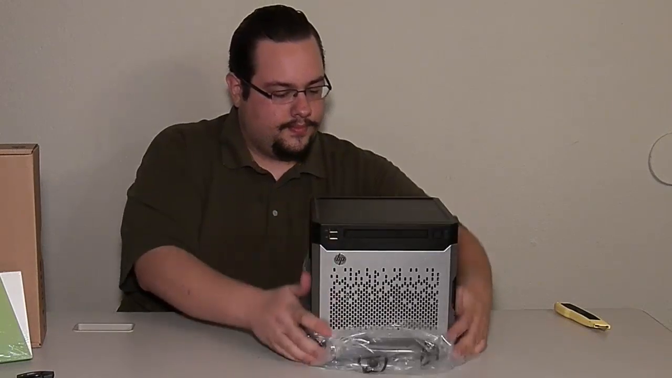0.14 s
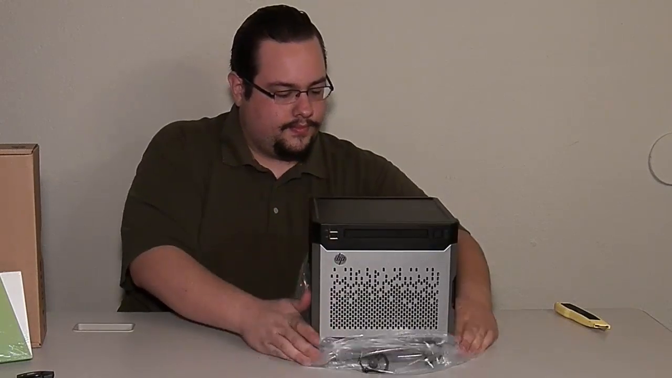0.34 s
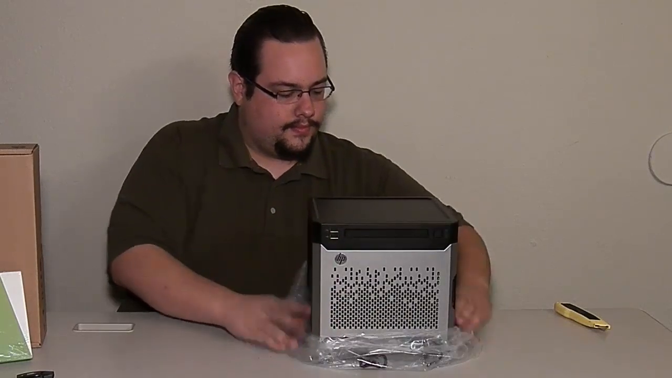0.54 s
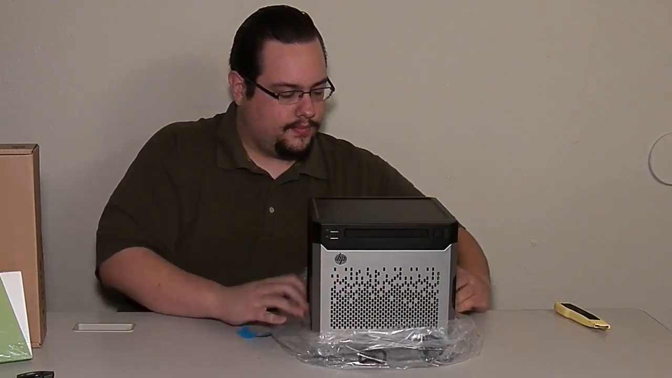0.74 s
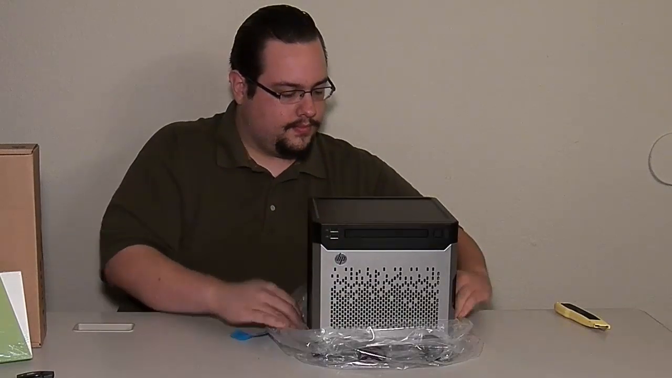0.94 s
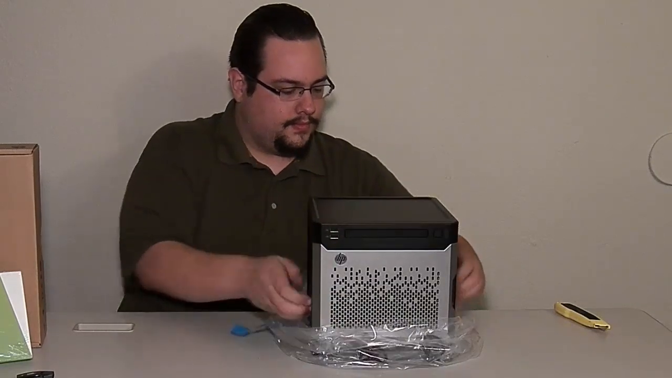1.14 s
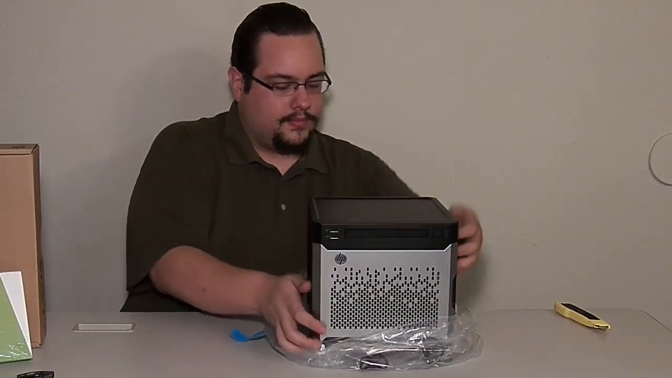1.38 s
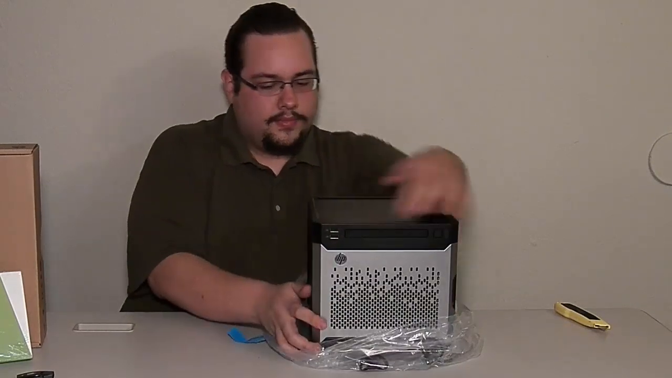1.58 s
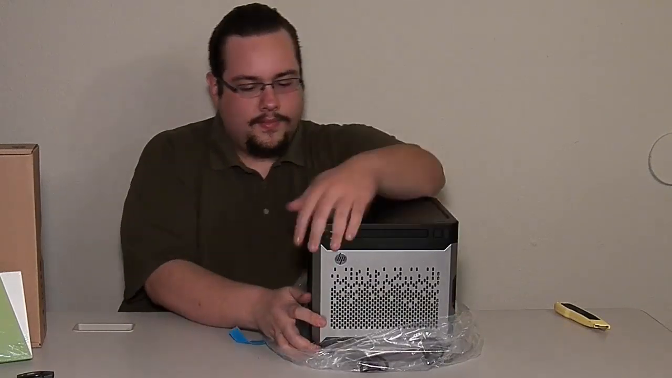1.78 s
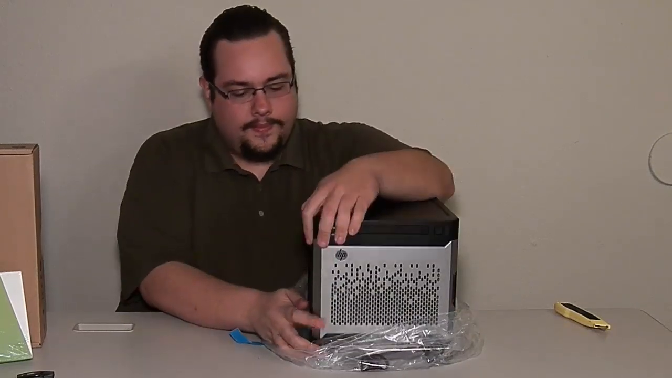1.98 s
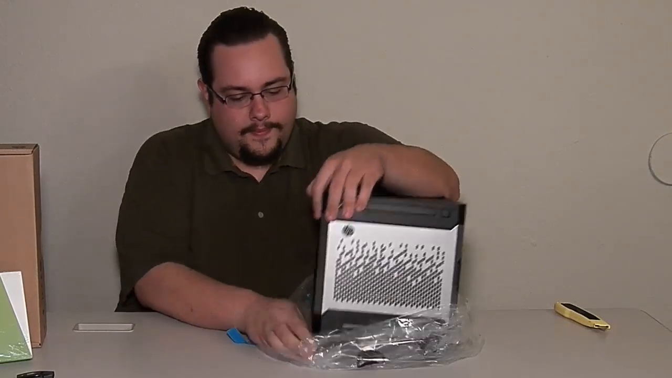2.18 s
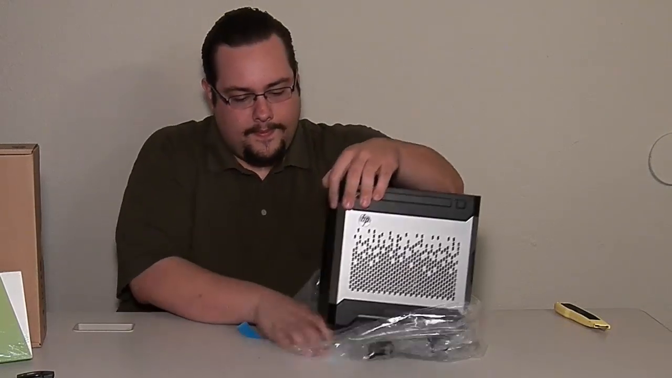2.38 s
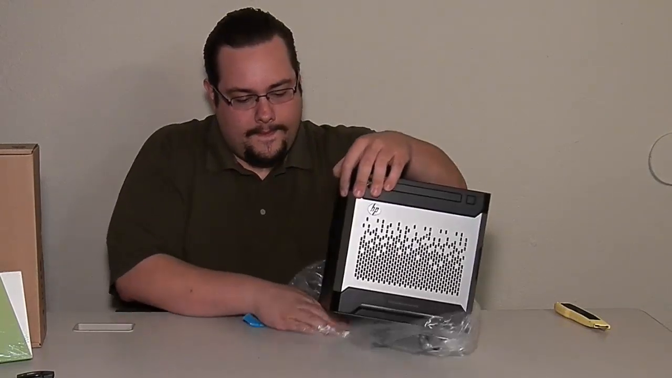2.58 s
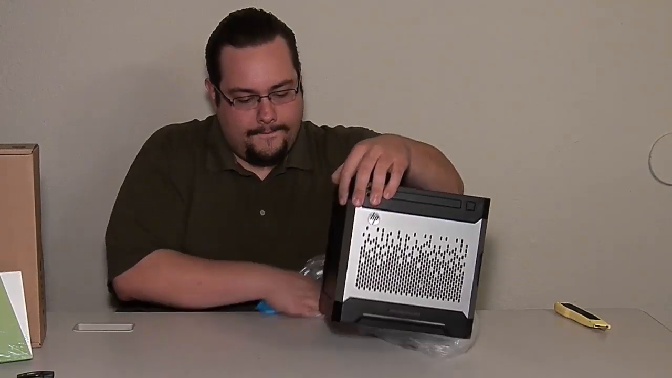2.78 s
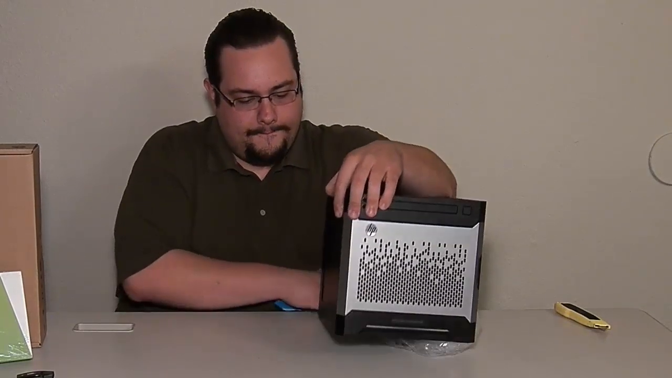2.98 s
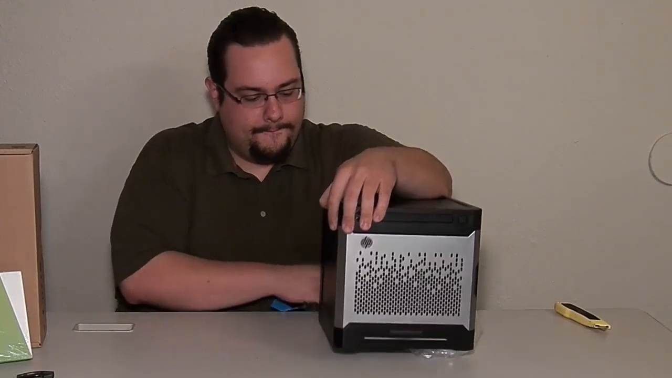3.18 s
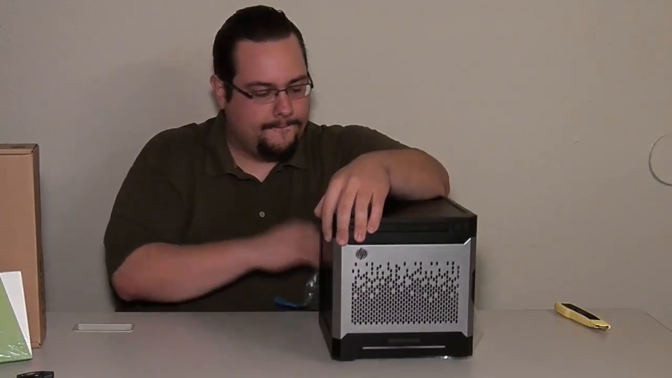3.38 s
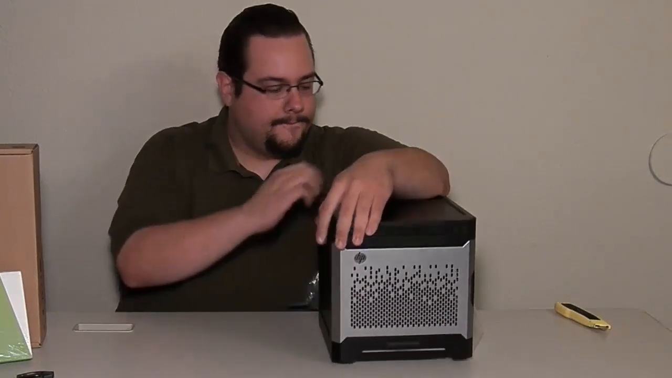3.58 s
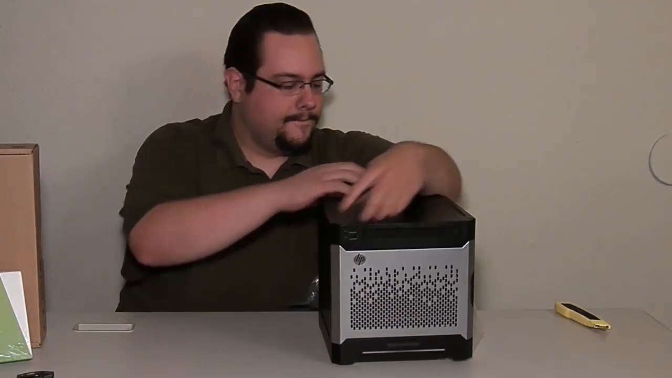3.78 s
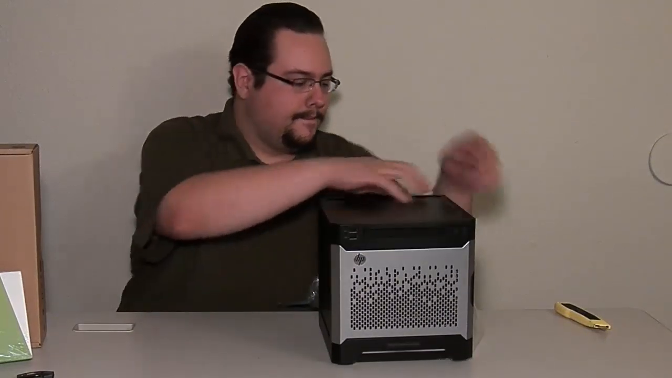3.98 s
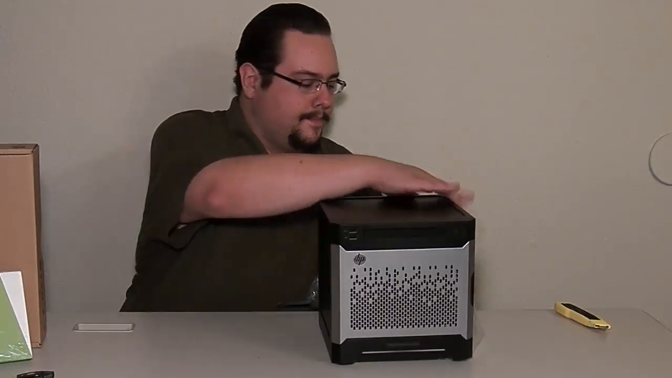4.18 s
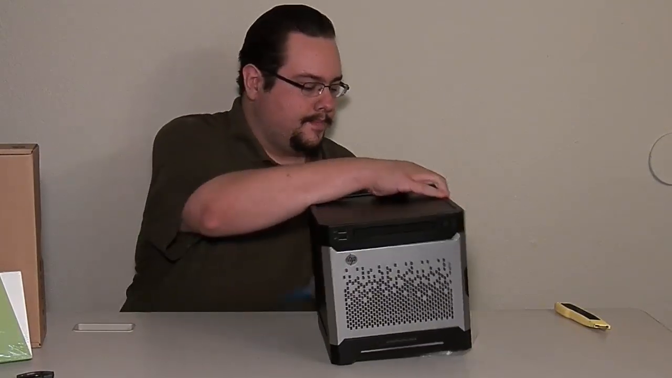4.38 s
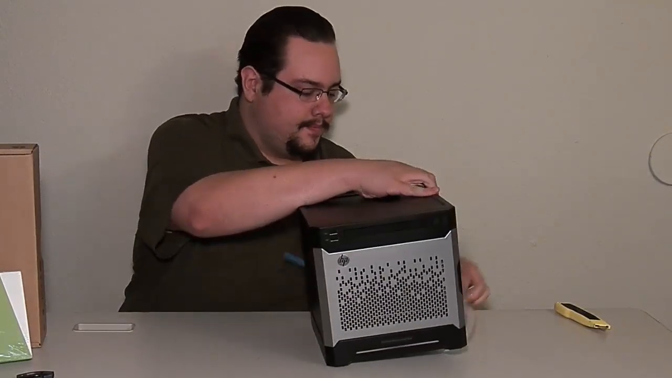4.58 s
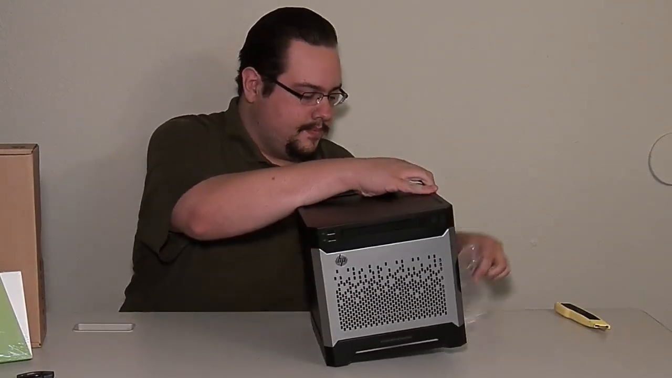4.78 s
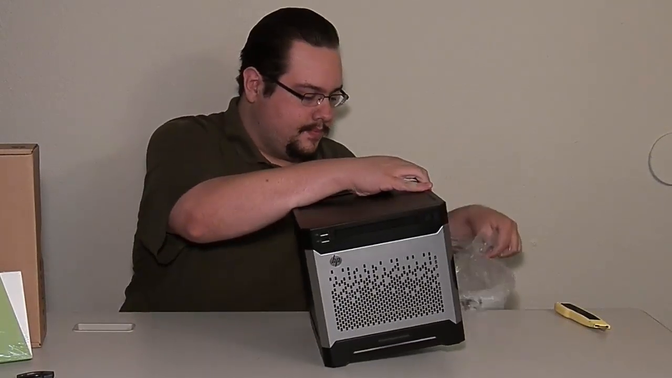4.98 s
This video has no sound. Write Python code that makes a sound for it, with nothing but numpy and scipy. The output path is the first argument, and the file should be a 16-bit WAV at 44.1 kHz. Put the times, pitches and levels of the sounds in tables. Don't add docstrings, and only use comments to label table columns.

```python
import sys
import numpy as np
from scipy import signal
from scipy.fft import rfft, irfft, next_fast_len
from scipy.io import wavfile
from scipy.ndimage import uniform_filter1d, map_coordinates

SR = 44100
rng = np.random.default_rng(int(sys.argv[2]) if len(sys.argv) > 2 else 0)


def store_wav(level_fs):
    pcm = np.round(np.clip(np.atleast_2d(level_fs), -1, 1) * 32767)
    wavfile.write(sys.argv[1], SR, pcm.T.astype(np.int16))


def magnitude_from_level(level_db):
    exponent = np.asarray(level_db, float) / 20
    return 10 ** exponent


N = 222043

# t/s, effort level/dB, drag on the box against the effort level/dB
HAND_PULL = [(0, -43.5, -4.5), (.7, -45.5, -8.5), (0.904, -42, -5.5), (.965, -56.5, -9.5),
             (1.35, -52, -10.5), (1.5, -57, -23), (1.82, -66.5, -29), (2.13, -56.5, -12),
             (2.2, -49.5, -13.5), (2.42, -43.5, -5.5), (2.87, -43, -2), (3.05, -55, -5), (3.28, -58.5, -18),
             (3.77, -72.5, -3.5), (4.205, -89.5, 2), (4.249, -52.5, -8), (4.8, -45.5, -1.5),
             (5.03, -53.5, -6.5)]
# middle t/s, lift level/dB, half length t/s, coarseness level/dB
TUGS = [(0.015, 3, 0.05, -1.5), (0.156, -1.5, 0.0099, -1), (0.242, -2.5, .05, 0), (0.484, 1, 0.12, 0),
        (0.673, -4, 0.026, -0.5), (.83, 0.5, .03, -0.5), (1.095, 6, 0.051, 0), (1.188, -2, .02, 2),
        (1.357, 3.5, 0.025, -1.5), (1.456, 2, 0.04, 0.5), (1.656, 6, 0.02, 1.5), (1.733, 6.5, 0.018, 4.5),
        (1.852, 6.5, 0.017, -4), (1.99, 2, 0.018, 1), (2.3, 3.5, .02, 1.5), (2.415, 2.5, 0.032, -1.5),
        (2.513, -2, 0.034, 0.5), (2.57, 3.5, .01, 0), (2.652, 2, 0.033, 0), (2.728, -3.5, 0.022, 2),
        (3.16, 5.5, 0.057, 1.5), (3.385, 9.5, 0.048, 3), (3.498, 12, 0.0071, 4.5), (3.551, -15, 0.019, 0),
        (3.667, 7, 0.068, 0), (3.81, 3, .03, -5), (3.9, -2, 0.011, -10), (4.64, 1.5, 0.021, -2.5),
        (4.883, 0.5, 0.013, -5), (4.96, 1, 0.022, -3)]
# t/s, fine creases against the usual level/dB
CRISPNESS = [(0, 0), (.2, 0), (1.0, 0.5), (1.3, -0.5), (1.56, -1), (1.7, 3), (1.9, -1.5), (2.13, -7),
             (2.19, 0.5), (2.5, 0), (3.2, -0.5), (3.5, 0.5), (3.6, -0.5), (3.8, -2.5), (4.4, 1.5),
             (5.03, -0.5)]
# f/Hz, level/dB per Hz
FILM_COLOUR = [(290, -6.5), (500, -12), (639, -7), (1070, -7), (1150, -5.5), (1200, -6), (1580, -6.5),
               (2540, -7.5), (3970, 3), (4580, 0), (11200, -15), (14500, -20), (15600, -37)]
CREASE_EDGES = (800, 2500, 6000, 10000, 20000)
# burst life t/s, left-right unlikeness [ratio], share of dullness [ratio]
CREASE_SIZES = [(0.0023, 0.26, 0.43), (0.0017, 0.53, -0.17), (0.0027, 1.25, -0.19), (.003, 1.5, -0.71)]
# f/Hz, width f/Hz, level/dB
MIC_PORT = (3780, 400, 2.6)
# t/s, peak level/dB, low part level/dB, high part level/dB
SETTLING_SNAPS = [(.0413, -22, -7, -5), (.1566, -24, -1, 10), (.334, -27, -2, 10), (.4968, -26, -20, -23),
                  (.5236, -26, -13, -10), (.8126, -26, -8, -5), (1.0194, -33, -13, -2),
                  (1.4628, -32, -19, -6), (1.4917, -35, -15, -8), (1.5486, -41, 1, -7),
                  (1.5978, -36, -14, -1), (1.6321, -42, -1, -16), (1.6379, -39, -3, -2),
                  (1.6644, -38, -10, -2), (1.6741, -36, -4, -14), (1.716, -40, 2, -2), (1.7204, -40, 2, -6),
                  (1.732, -40, 0, -6), (1.7453, -36, -5, -9), (1.8329, -37, -14, -2), (1.8449, -46, 0, -6),
                  (1.8729, -44, -15, -22), (1.8976, -44, -1, -19), (1.9303, -38, -2, -2),
                  (1.9772, -38, -6, -22), (1.9933, -46, -16, -4), (2.007, -43, -1, 3),
                  (2.082, -38, -15, -6), (2.1208, -38, 0, -10), (2.1571, -39, -9, -13)]
# t/s, peak level/dB, low part level/dB, high part level/dB
DRAGGED_SNAPS = [(2.1835, -27, -8, -9), (2.2007, -33, -5, -5), (2.3045, -27, -7, -7), (2.3518, -26, -14, 3),
                 (2.4093, -25, -12, -14), (2.4249, -20, -22, -10), (2.4376, -21, -6, -11),
                 (2.5525, -27, -4, -9), (2.6225, -24, -5, -9), (2.7168, -22, -9, -6),
                 (2.7234, -23, -19, -12), (3.0059, -32, 5, -10), (3.1156, -34, -5, -9),
                 (3.1286, -31, -11, -6), (3.3059, -38, -2, -14), (3.3341, -29, -3, -9),
                 (3.3461, -32, -4, -9), (3.3844, -32, -8, -14), (3.4369, -37, 6, 3), (3.4901, -40, 2, -11),
                 (3.4991, -33, -2, -8), (3.5032, -36, -9, -8), (3.5689, -37, -16, -16),
                 (3.6137, -38, 0, -13), (3.6395, -42, -22, -13), (3.6481, -35, -10, -5),
                 (3.6673, -40, -20, -10), (3.8973, -52, -10, -26), (4.2643, -38, -23, -23),
                 (4.7631, -25, -10, -6)]
# f/Hz, width f/Hz, level/dB
BOX_WALLS = [(353, 81, -1.5), (441, 52, 0.5), (522, 43, 0), (636, 119, -2.5), (850, 161, -5)]
# f/Hz, level/dB per Hz
DESK_SHAKE = [(12, -53), (20, -9), (46, -4), (211, -4.5), (245, -7), (274, -7.5), (300, -0.5), (390, -43),
              (660, -120)]
# t/s, peak level/dB, wall pitch f/Hz
WALL_BUMPS = [(.455, -32.5, 1192), (0.785, -41.5, 424), (0.846, -35.5, 460), (0.885, -35, 444),
              (0.92, -49, 441), (1.05, -42, 421), (1.084, -38, 437), (1.208, -37, 450), (1.246, -45, 454),
              (2.192, -38, 606), (2.248, -37.5, 596), (2.569, -36, 629), (2.659, -35.5, 441),
              (3.037, -42.5, 424), (4.047, -67, 555), (4.11, -62, 422), (4.169, -77, 346),
              (4.587, -36.5, 630), (4.781, -34.5, 445), (4.819, -40, 589)]
# t/s, peak level/dB, swell t/s, damping [factor]
FOOT_THUDS = [
    (3.68, -42, 0.021, 1.6),
    (3.76, -63, .015, 1.4),
    (3.814, -53, 0.019, 1.7),
    (3.841, -55, 0.0097, 3.2),
    (4.442, -46.5, 0.016, 2),
    (4.49, -59, 0.012, 1.4),
    (4.563, -58, 0.014, 1.5),
    (4.589, -63, 0.012, 1.8),
    (4.776, -58, .015, 1.3),
    (4.849, -62, 0.017, 1.4),
]
# f/Hz, level/dB, t60 t/s
DESK_MODES = [(83, -3, 0.17), (123.5, 6, 0.25), (178, 3, 0.13), (238, -12.5, 0.17)]
# f/Hz, t60 t/s
ROOM_DECAY = [(200, 0.41), (2000, 0.36), (6000, 0.34), (14000, 0.35)]
# f/Hz, left-right likeness [ratio]
LEFT_RIGHT_LIKENESS = [(40, 0.39), (150, 0.68), (700, 0.52), (2500, 0), (6000, 0)]
# f/Hz, level/dB per Hz
ROOM_TONE = [(12, -79), (20, -29), (85, -1), (122, -8), (232, -19), (383, -9), (506, -12.5), (566, -14.5),
             (650, -18), (2550, -27.5), (9690, -19), (13500, -21), (15600, -23)]
# f/Hz, level/dB
WHINES = [(7951, -97), (11843, -86)]

LARGE_DB, FINE_DB = -2.5, -6
COARSE_DULLS, DRAG_COARSE = -0.25, 0.5
TAUT_S, TAUT_DB, GRIP_S = 4.26, 23, 0.028
LARGE_LAG_S, FINE_LAG_S, DRAG_LAG_S = .035, .1, .06
SNAP_PAN_DB = 4.5
QUIET_DB = -72.5


def bag():
    return crackle() + snaps()


def crackle():
    level, large, fine, _ = pull()
    draw = rng.random((40000, 4))
    s = draw[:, 0] * N / SR
    size_db = np.minimum(-3.8 * np.log(draw[:, 1] + 1e-9), 18)
    clumps_db = 1.27 * wobble(24.92) + 0.94 * wobble(90)
    size_db += clumps_db[(s * SR).astype(int)]
    dull_db = 22 * (draw[:, 2] - .5)
    pan_db = 6 * (draw[:, 3] - .5)
    layers = creases(s, size_db, dull_db, pan_db)
    finest = level + 1.48 * fine - 1.5 + .12 * (level + 48)
    levels = (level + large - 0.5, level - 2.0, level + fine + 1.0, finest)
    return sum(magnitude_from_level(levels[k]) * steady(voiced(layers[k], size=k)) for k in range(len(layers)))


def snaps():
    s, db, large_db, fine_db = np.transpose(SETTLING_SNAPS + DRAGGED_SNAPS)
    pan_db = SNAP_PAN_DB * rng.standard_normal(len(s))
    shares_db = (large_db + 2, 0 * db, fine_db - 1, 1.3 * fine_db - 9)
    rows = 0
    for k, share_db in enumerate(shares_db):
        life, apart, _ = CREASE_SIZES[k]
        burst = bursts(len(s), .8 * life, .6 * apart)
        part = voiced(np.pad(burst, ((0, 0), (0, 0), (0, 400))), size=k)
        rows = rows + magnitude_from_level(share_db)[:, None] * part / np.linalg.norm(part, axis=2, keepdims=True)
    peak = np.abs(signal.hilbert(rows.mean(axis=0)))
    side_db = db + np.outer((.5, -.5), pan_db)
    rows = rows * (magnitude_from_level(side_db) / peak.max(axis=1))[..., None]
    return lay(s - peak.argmax(axis=1) / SR, rows)


def creases(s, db, dull_db, pan_db):
    place = magnitude_from_level(db + np.outer((.5, -.5), pan_db))[..., None]
    layers = []
    for life, apart, tilt in CREASE_SIZES:
        rows = bursts(len(s), life, apart) * place * magnitude_from_level(tilt * dull_db)[:, None]
        layers.append(lay(s, rows))
    return layers


def bursts(count, life, apart):
    shape = rng.standard_normal((count, 3, 32))
    decay = magnitude_from_level(-60 * np.arange(32) / SR / life)
    pair = (shape[:, :1] + apart * shape[:, 1:]) * decay
    return np.moveaxis(pair / np.linalg.norm(pair, axis=2, keepdims=True), 1, 0)


def voiced(x, size):
    port_hz, width, lift_db = MIC_PORT

    def below(hz, edge):
        return 1 / np.sqrt(1 + (edge / (hz + 1)) ** 8)

    def gain(hz):
        low_cut = below(hz, CREASE_EDGES[size])
        high_cut = np.sqrt(1 - below(hz, CREASE_EDGES[size + 1]) ** 2)
        port = magnitude_from_level(lift_db / (1 + (2 * (hz - port_hz) / width) ** 2))
        return magnitude_from_level(along(FILM_COLOUR, hz)) * port * low_cut * high_cut

    return filtered(x, gain)


def pull():
    t = np.arange(N) / SR
    s, effort, drag = np.transpose(HAND_PULL)
    mid, lift, half, coarse = np.transpose(TUGS)[..., None].astype(np.float32)
    coarse_t = t[::32]
    shape = np.exp(-.5 * ((coarse_t - mid) / half) ** 2)
    lift = np.interp(t, coarse_t, (lift * shape).sum(axis=0))
    coarse = np.interp(t, coarse_t, (coarse * shape).sum(axis=0))

    def taut(lag):
        tighten = np.clip((t - TAUT_S) / GRIP_S + 1, 0, 1)
        return TAUT_DB * tighten * np.exp(-np.maximum(t - TAUT_S, 0) / lag)

    level = np.interp(t, s, effort) + lift
    large = LARGE_DB + coarse - taut(LARGE_LAG_S)
    crisp = np.interp(t, *np.transpose(CRISPNESS))
    fine = FINE_DB + COARSE_DULLS * coarse - taut(FINE_LAG_S) + crisp
    drag = np.interp(t, s, drag) + DRAG_COARSE * coarse - taut(DRAG_LAG_S)
    return level, large, fine, drag


def box_hum(drag_db):
    def walls(f):
        total = 0
        for k, (c, w, db) in enumerate(BOX_WALLS):
            mode = 1j * f * w / (c * c - f * f + 1j * f * w)
            total = total + (-1) ** k * magnitude_from_level(db) * mode
        return total / (1 + (310 / (f + 1)) ** 6)

    jerks = magnitude_from_level(3.0 * wobble(40)) * rng.standard_normal(N)
    return magnitude_from_level(drag_db - 3.0) * steady(filtered(jerks[None], walls))[0]


def bumps():
    out, t = np.zeros(N + SR), np.arange(SR // 4) / SR
    for s, db, hz in WALL_BUMPS:
        neighbour = np.sin(2 * np.pi * 1.1 * hz * t + rng.uniform(0, 10.2))
        ring = np.sin(2 * np.pi * hz * t) + 0.24 * neighbour
        decay = magnitude_from_level(db + 0.1 - 60 * t / 0.073)
        out[round(s * SR):][:len(t)] += decay * ring * (1 - np.exp(-t / 0.01))
    return out[:N]


def thuds():
    out, t = np.zeros(N + SR), np.arange(SR // 2) / SR
    for s, db, swell, damping in FOOT_THUDS:
        ring = 0
        for hz, level, t60 in DESK_MODES:
            decay = magnitude_from_level(level + rng.normal(0, 1.5) - 60 * damping * t / t60)
            ring = ring + decay * np.sin(2 * np.pi * hz * t + rng.uniform(0, 8.4))
        out[round(s * SR):][:len(t)] += magnitude_from_level(db + 8.5) * ring * (1 - np.exp(-t / abs(swell))) ** 2
    return out[:N]


def desk_shake(drag_db):
    lumps = magnitude_from_level(3.4 * wobble(20)) * diffuse(size=N + N % 2)[:, :N]
    rumble = unit(filtered(lumps, lambda f: magnitude_from_level(along(DESK_SHAKE, f))))
    return magnitude_from_level(0.81 * uniform_filter1d(drag_db, size=4000) - 22.5) * rumble


def room(x):
    out, hop = np.zeros((2, N + SR)), SR // 25
    fade = np.hanning(2 * hop)
    x = np.pad(x, (hop, 2 * hop))
    for a in range(0, N + hop, hop):
        hz, t, z = signal.stft(diffuse(size=12288), SR, nperseg=256)
        decay = magnitude_from_level(-60 * t / along(ROOM_DECAY, hz)[:, None])
        tail = signal.istft(z * decay, SR, nperseg=256)[1]
        piece = (x[a:a + 2 * hop] * fade)[None]
        wet = signal.fftconvolve(piece, tail / np.linalg.norm(tail[0]), axes=1)
        out[:, a:a + wet.shape[1]] += wet
    return out[:, hop - 130:][:, :N]


def quiet():
    noise = diffuse(size=N + N % 2)[:, :N]
    hiss = magnitude_from_level(QUIET_DB) * unit(filtered(noise, lambda f: magnitude_from_level(along(ROOM_TONE, f))))
    t = np.arange(N) / SR
    whine = sum(magnitude_from_level(db - 1 + 1.5 * wobble(5.6)) * np.sin(2 * np.pi * hz * t) for hz, db in WHINES)
    return hiss + whine


def diffuse(size):
    a, b = rfft(rng.standard_normal((2, size)))
    likeness = along(LEFT_RIGHT_LIKENESS, np.fft.rfftfreq(size, 1 / SR))
    turn = np.arccos(np.clip(likeness, -1, 1)) / 2
    mid, side = a * np.cos(turn), b * np.sin(turn)
    return irfft([mid + side, mid - side], size)


def wobble(rate):
    knots = rng.standard_normal(int(N * rate / SR) + 4)
    return map_coordinates(knots, [np.arange(N) * rate / SR])


def lay(s, rows):
    start = np.round(s * SR).astype(int)[:, None]
    at = (start + np.arange(rows.shape[-1])).ravel()
    return np.array([np.bincount(at, side.ravel(), N + SR)[:N] for side in rows])


def filtered(x, gain):
    m = 2 * next_fast_len(x.shape[-1] // 2 + 4096)
    cep = irfft(np.log(np.abs(gain(np.fft.rfftfreq(m, 1 / SR))) + 1e-6), m)
    cep[1:m // 2] *= 2
    cep[m // 2 + 1:] = 0
    return irfft(rfft(x, m) * np.exp(rfft(cep)), m)[..., :x.shape[-1]]


def along(points, hz):
    f, v = np.transpose(points)
    return np.interp(np.log(hz + 1), np.log(f + 1), v)


def steady(x):
    power = uniform_filter1d(np.mean(x ** 2, axis=0), size=4000)
    return x / np.sqrt(np.abs(power) + 1e-12)


def unit(x):
    return x / np.sqrt(np.mean(x ** 2) + 1e-20)


def scene():
    film = bag()
    effort, _, _, drag = pull()
    hum = box_hum(effort + drag) + bumps()
    feet = thuds()
    shake = desk_shake(effort + drag)
    wet = magnitude_from_level(1.0) * room(film.mean(axis=0) + magnitude_from_level(-3.0) * hum + magnitude_from_level(-11) * feet)
    return film + hum + feet + shake + wet + quiet()


def roll_off(x):
    return signal.sosfilt(signal.butter(12, 15300, fs=SR, output="sos"), x)


def record(dry):
    return roll_off(dry)


dry = scene()
out = record(dry)
store_wav(out)
```